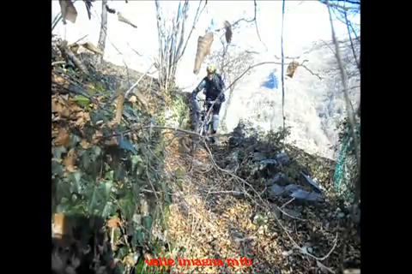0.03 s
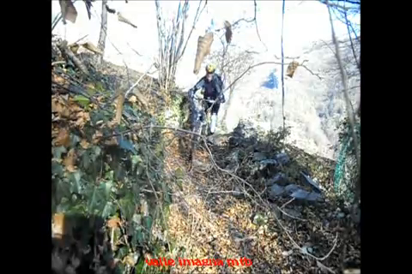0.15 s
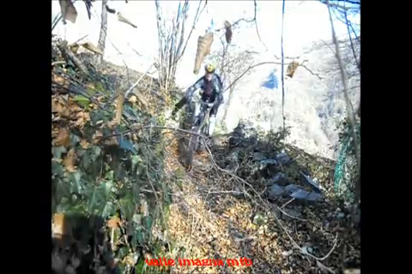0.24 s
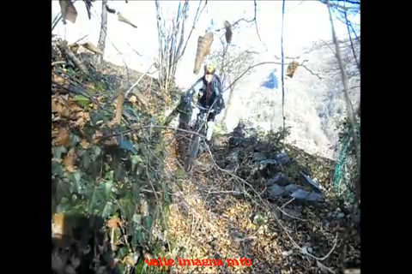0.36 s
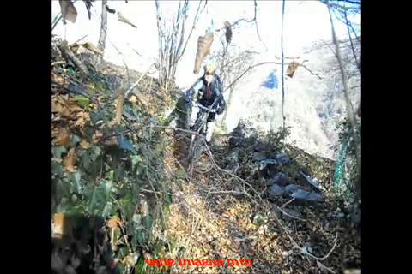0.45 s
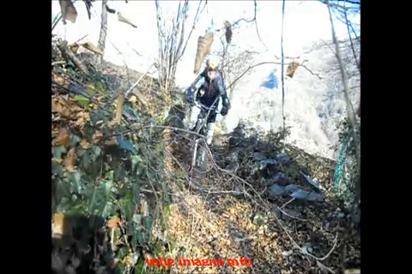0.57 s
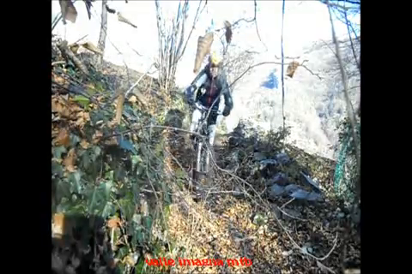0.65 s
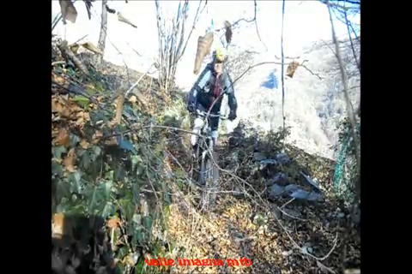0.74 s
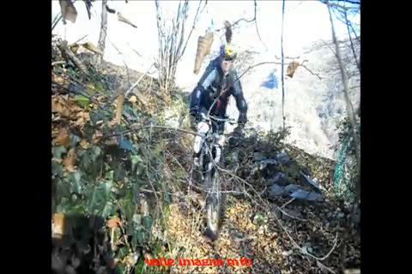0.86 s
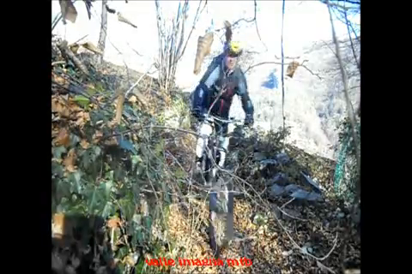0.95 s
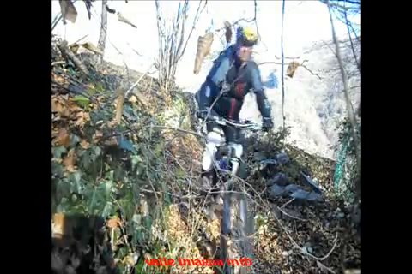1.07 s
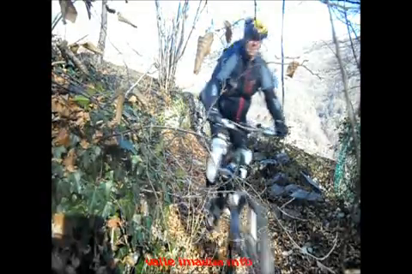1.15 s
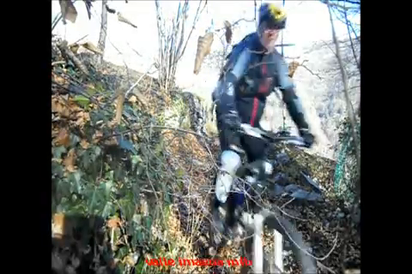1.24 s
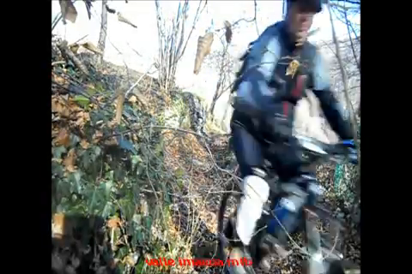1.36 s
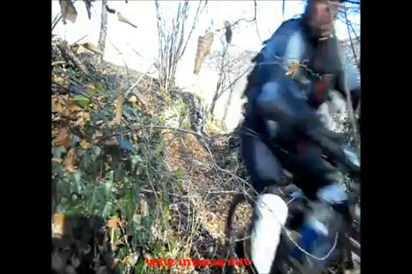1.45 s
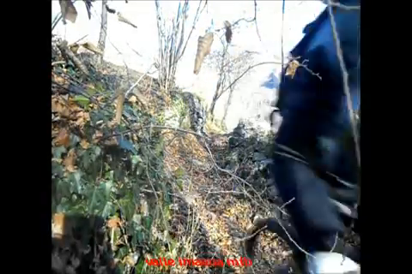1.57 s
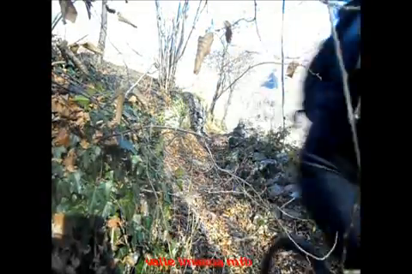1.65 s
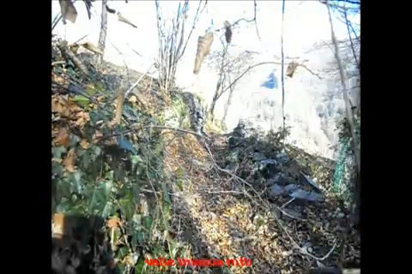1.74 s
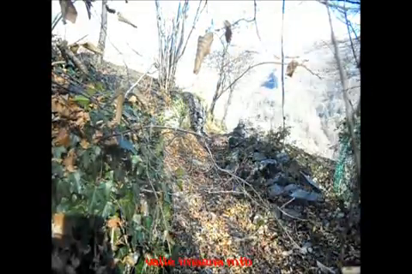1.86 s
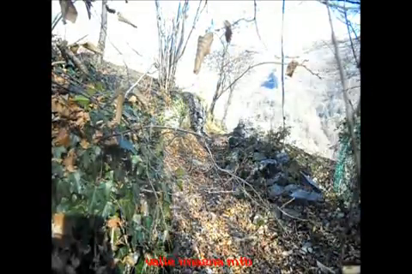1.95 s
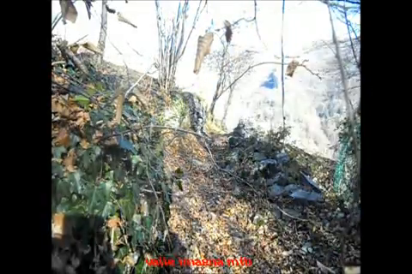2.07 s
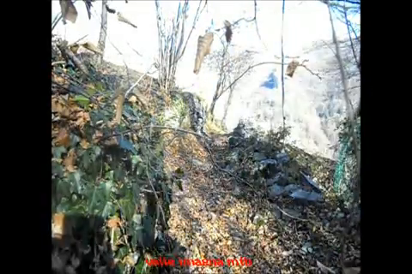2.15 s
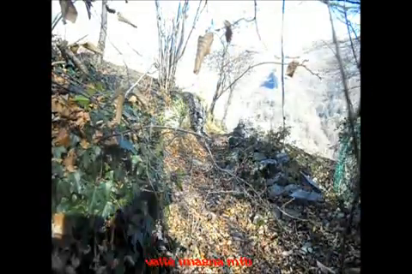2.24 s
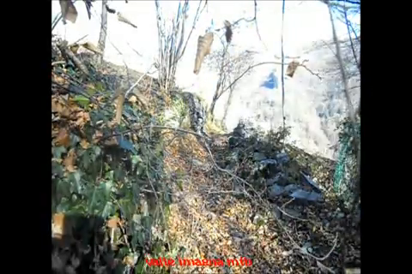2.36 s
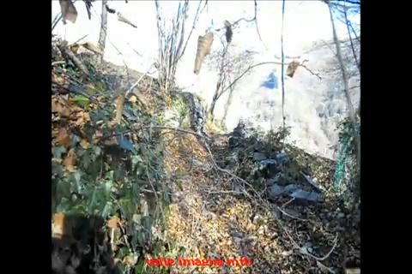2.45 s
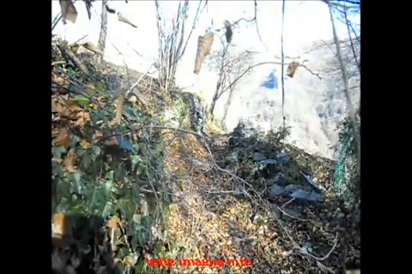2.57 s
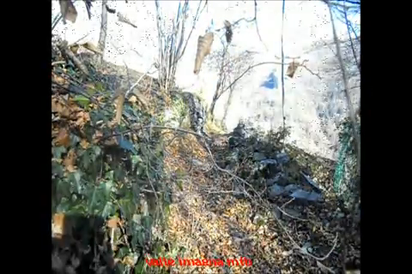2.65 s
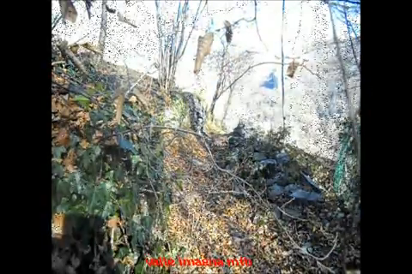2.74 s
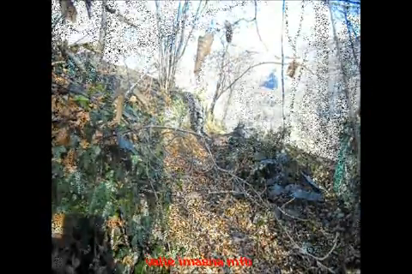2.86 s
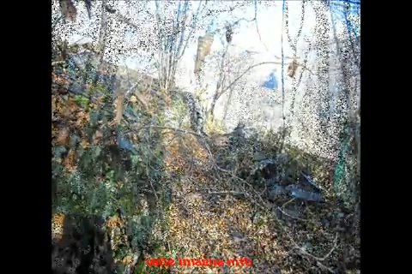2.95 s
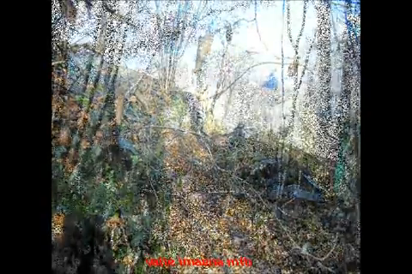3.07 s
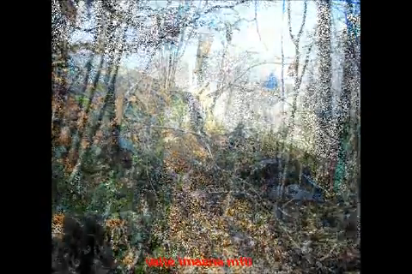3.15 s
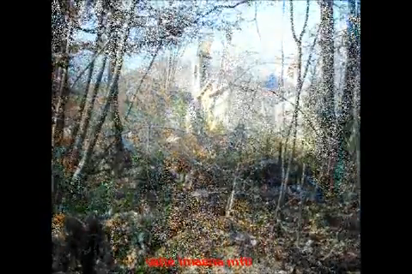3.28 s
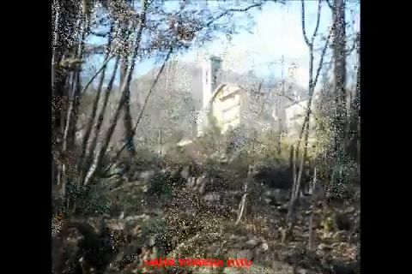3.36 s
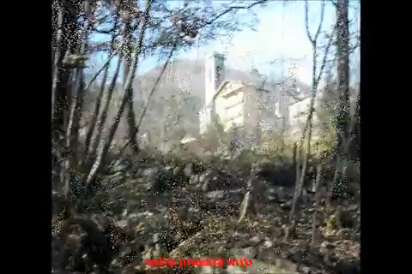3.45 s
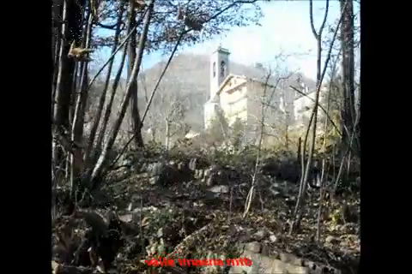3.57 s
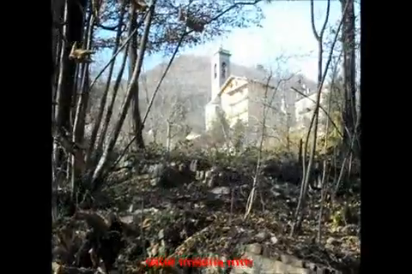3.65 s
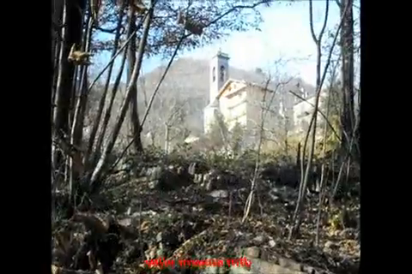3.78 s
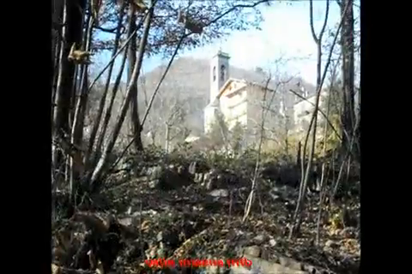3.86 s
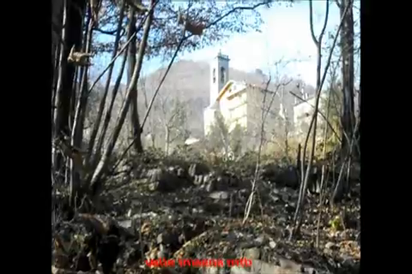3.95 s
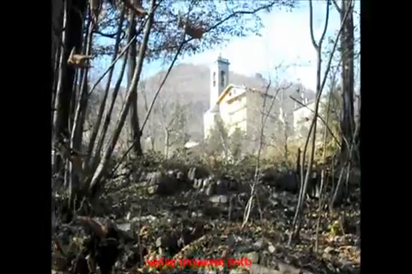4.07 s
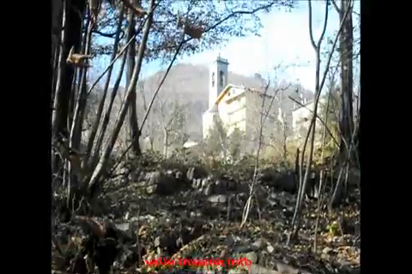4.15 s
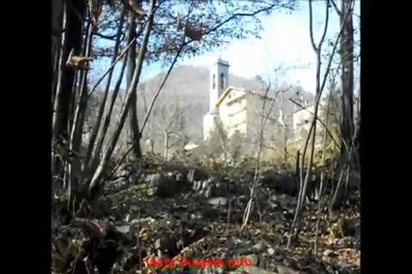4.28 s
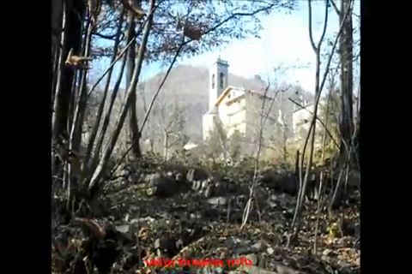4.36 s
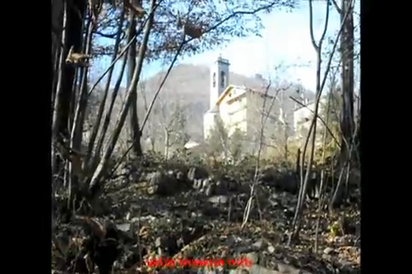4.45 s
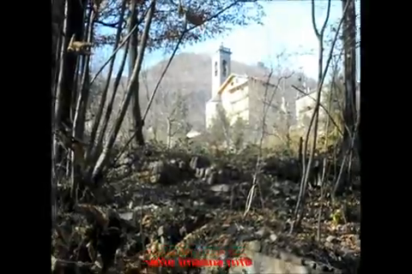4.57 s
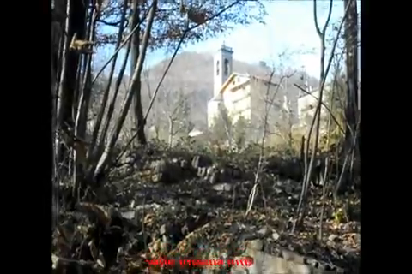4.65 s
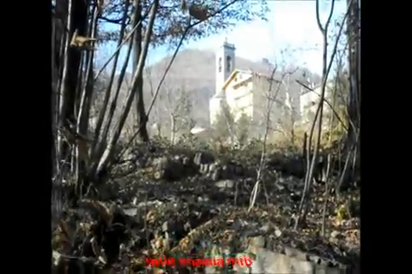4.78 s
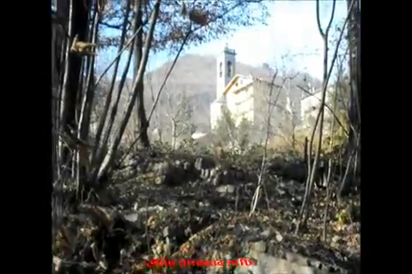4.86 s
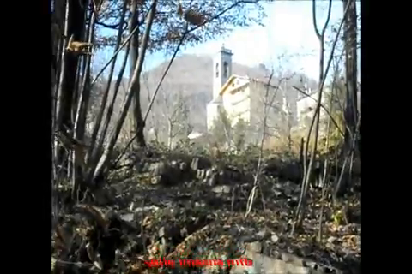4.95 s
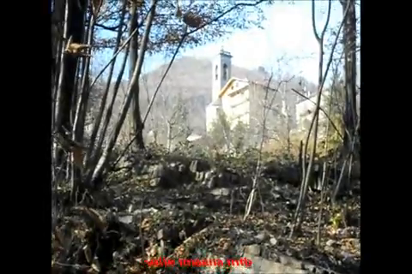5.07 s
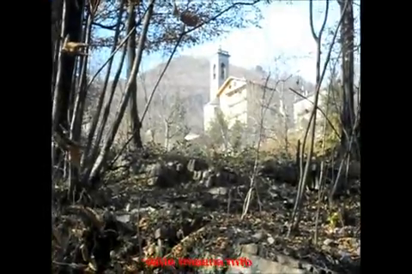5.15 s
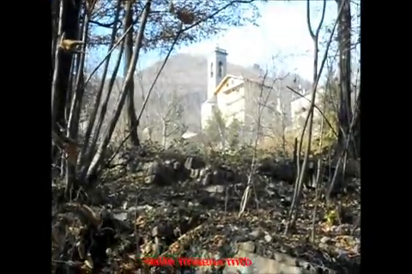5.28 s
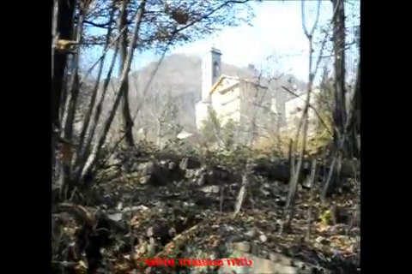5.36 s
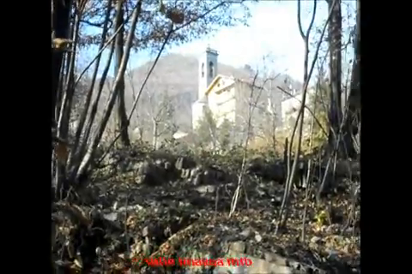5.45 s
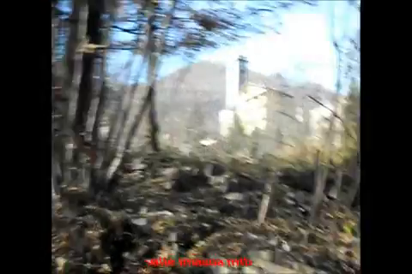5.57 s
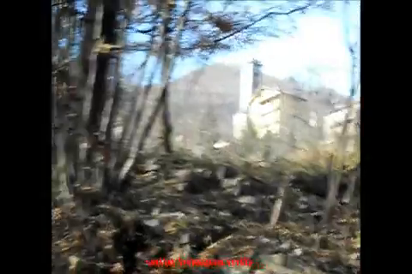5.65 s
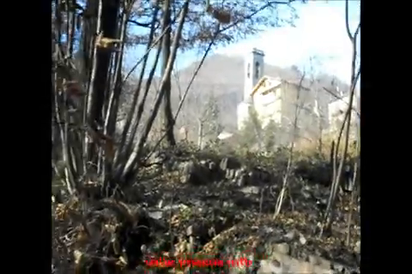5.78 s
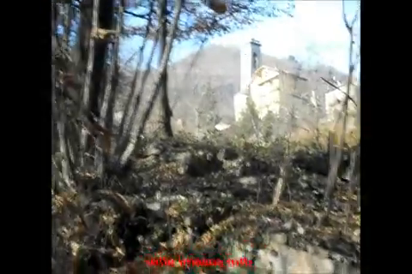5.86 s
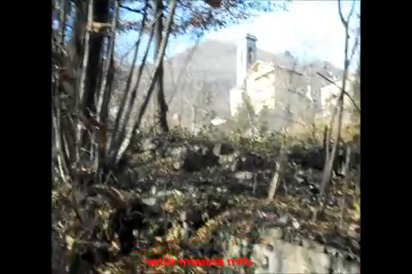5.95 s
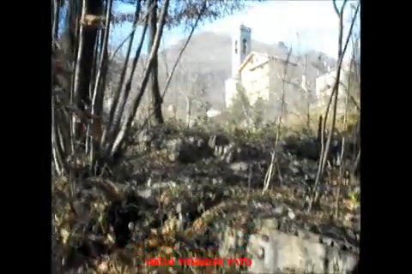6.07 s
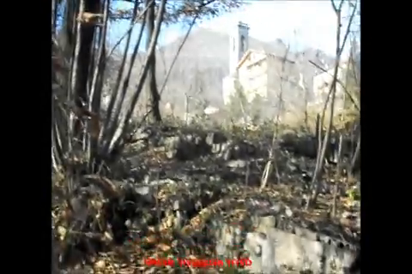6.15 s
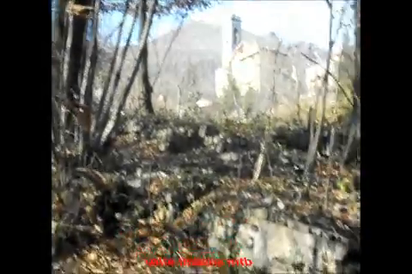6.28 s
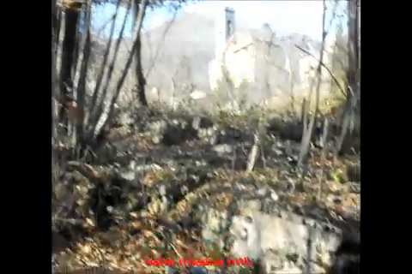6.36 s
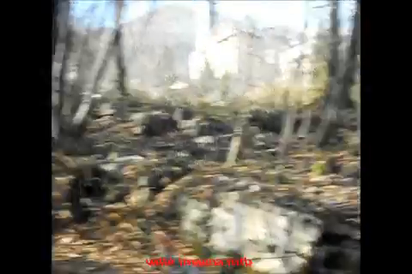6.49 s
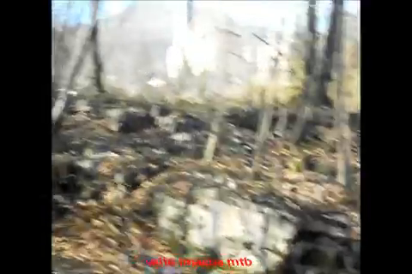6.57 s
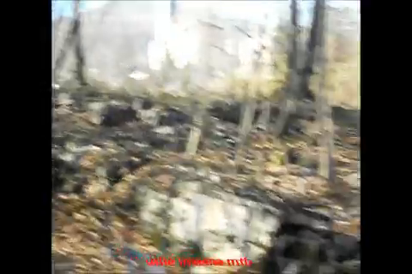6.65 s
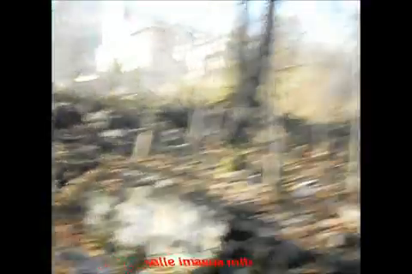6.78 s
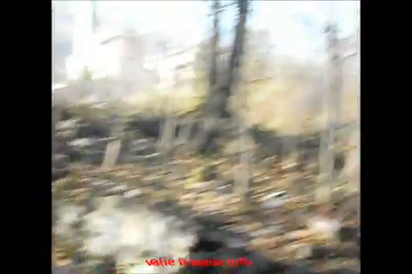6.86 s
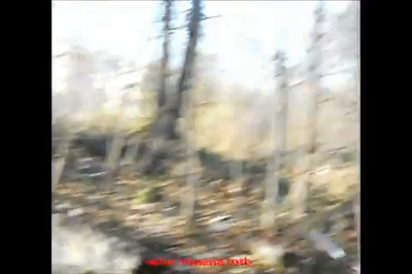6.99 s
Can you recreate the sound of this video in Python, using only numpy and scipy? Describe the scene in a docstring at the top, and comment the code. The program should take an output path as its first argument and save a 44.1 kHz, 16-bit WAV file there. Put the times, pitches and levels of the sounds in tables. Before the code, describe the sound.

A bike crunches over dry leaves and rolls away; quiet outdoor air follows, with sharp twig snaps and a late swell of rustling.

```python
"""Dry leaves crackle under a bicycle coming down a woodland trail. Twigs snap, both wheels strike
a root as it passes close to the microphone, and it rolls away. At about 3.7 s the scene changes
at once to a quieter spot: still air, a few twig snaps and knocks, and leaves that rustle up again
near the end. One microphone, with light wind on it, dull above 11 kHz."""
import sys
import numpy as np
from scipy import signal
from scipy.fft import rfft, irfft
from scipy.io import wavfile
from scipy.ndimage import uniform_filter1d

SR = 44100
rng = np.random.default_rng(int(sys.argv[2]) if len(sys.argv) > 2 else 0)


def master(y):
    """Save y as 16-bit WAV."""
    cut = np.clip(np.atleast_2d(y).T, -1, 1)
    pcm = np.round(cut * 32767)  # scale
    wavfile.write(sys.argv[1], SR, pcm.astype(np.int16))


N = 309582


def gain_of(db):
    """Decibels to amplitude."""
    return 10 ** (np.asarray(db) / 20)


def unit_rms(x):
    """Scales to rms 1."""
    return x / np.sqrt(np.mean(x ** 2) + 1e-20)


def add(mix, start_s, sound):
    """Mixes a sound in at start_s."""
    part = mix[round(start_s * SR):][:len(sound)]
    part += sound[:len(part)]


def curves(table):
    """A gate open from the first row's time to the last, and the other columns at every sample."""
    t, rows = np.arange(N) / SR, np.array(table)
    gate = (t >= rows[0, 0]) & (t < rows[-1, 0])
    return uniform_filter1d(gate * 1., size=100), [np.interp(t, rows[:, 0], c) for c in rows.T[1:]]


def coloured(x, spectrum):
    """Filters x to a spectrum drawn on a log-frequency axis, at rms 1."""
    hz, db = np.transpose(spectrum)
    curve_db = np.interp(np.log(np.fft.rfftfreq(N, 1 / SR) + 1), np.log(hz + 1), db)
    return unit_rms(irfft(rfft(x) * gain_of(curve_db), N))


def flutter(ms):
    """Random wander of rms 1, smoothed over ms milliseconds."""
    size = round(ms * SR / 1000)
    return unit_rms(uniform_filter1d(uniform_filter1d(rng.standard_normal(N), size), size))


def patches(spectra, bands, frames):
    """Random patches of rms 1 across frequency and time."""
    noise = rng.standard_normal(spectra.T.shape).T
    return unit_rms(uniform_filter1d(uniform_filter1d(noise, bands, axis=0), frames, axis=1))


def grainy_noise(per_s, spread_db, tick_share, clump_db, patch_db):
    """Hiss with separate ticks, like countless tiny breaks and a few larger; in clumps and patches."""
    sizes = gain_of(spread_db * np.minimum(rng.exponential(1, N), 3.2))
    ticks = sizes * (rng.random(N) < per_s / SR)
    hiss = np.sqrt(1 - tick_share) * rng.standard_normal(N)
    grains = hiss + np.sqrt(tick_share) * unit_rms(ticks * rng.choice([-1, 1], N))
    spectra = signal.stft(grains, nperseg=256)[2]
    spectra *= gain_of(patch_db * patches(spectra, bands=4, frames=6))
    return signal.istft(spectra, nperseg=256)[1][:N] * gain_of(clump_db * flutter(ms=10.6))


# Still air in the distant woods, with microphone hiss: frequency_hz, density_db
AIR_SPECTRUM = [(12, -38), (20, -9), (42, -5), (65, -21), (97, -12.5), (113, -11), (492, -18), (532, -19),
                (4950, -26.5), (9540, -30), (10600, -43), (13800, -73), (22000, -120)]
# Light wind right on the microphone: time_s, level_db
WIND_LEVELS = [(0.0, -42), (0.6, -42), (1.2, -44), (1.4, -58), (1.85, -57), (2.02, -54), (2.6, -58),
               (3.55, -45), (3.75, -62), (4.7, -44.5), (5.25, -55), (5.4, -41), (5.55, -39), (5.7, -45),
               (5.85, -47), (5.97, -50), (6.1, -48), (6.28, -50), (6.55, -43.5), (7.02, -43)]

def air(duck_db):
    """Hiss of woods and microphone, shifted by duck_db, and lumpy wind mostly below 70 Hz."""
    hiss = coloured(grainy_noise(200, 3.2, 0.042, 0.52, 1), AIR_SPECTRUM)
    wind_hz_db = [(3, 4.5), (8, -3), (16, 2), (35, -4.5), (70, -9), (130, -31), (400, -67)]
    wind = coloured(rng.standard_normal(N), wind_hz_db)
    _, (wind_db,) = curves(WIND_LEVELS)
    gust_db = 2 * flutter(ms=52)
    return gain_of(-46.5 + duck_db) * hiss + gain_of(wind_db + gust_db) * wind


# Leaves stirring at the quiet spot: time_s, crackle_db, rustle_re_crackle_db
STIR_LEVELS = [(3.68, -66, 12), (3.95, -66, -8), (4.2, -51.5, -1), (4.55, -49.5, 3.5), (4.9, -50.5, -1.5),
               (5.2, -52.5, 1.5), (5.44, -53.5, 8), (5.52, -46.5, 1), (5.54, -42, 0), (5.565, -40.5, 2),
               (5.6, -43, 1), (5.63, -44, -5), (5.66, -39.5, -8), (5.695, -51.5, 0.5), (6.0, -47, -1),
               (6.33, -44.5, 2), (6.45, -35.5, -5), (6.63, -26.5, -21), (6.75, -27, -6.5), (6.8, -33, -1.5),
               (6.87, -30.5, -1), (7.02, -41, -4)]
# Their high crackle and low rustle: frequency_hz, density_db
STIR_CRACKLE_SPECTRUM = [(1120, -5), (1900, -3.5), (5280, 0.5), (7400, -1), (8980, -5.5), (9940, -5),
                         (10600, -35), (13800, -48), (22000, -120)]
STIR_RUSTLE_SPECTRUM = [(88, -38), (150, -7.5), (422, -1), (632, -3.5), (774, -5), (846, -6), (1150, -5),
                        (1350, -4), (1550, -9), (2200, -11.5), (2860, -11), (4840, -120)]

def stirred_leaves():
    """A soft, smooth rustle of leaves without the weight of a tyre on them."""
    gate, (crackle_db, rustle_db) = curves(STIR_LEVELS)
    crackle = coloured(grainy_noise(1500, 3, 0.1, 0.7, 1.3), STIR_CRACKLE_SPECTRUM)
    rustle = coloured(grainy_noise(350, 1.2, 0.033, 1.4, 0.35), STIR_RUSTLE_SPECTRUM)
    return gate * gain_of(crackle_db) * (crackle + gain_of(rustle_db) * rustle)


# Moments when the bass briefly drops out and the sound thins: middle_s, length_s, top_hz
BASS_LULLS = [(0.25, 0.11, 174), (0.653, 0.046, 250), (1.284, 0.08, 89), (1.32, 0.032, 150),
              (1.417, 0.051, 254), (1.602, 0.051, 270), (1.85, 0.16, 60)]

def bass_lulls(x, depth_db=-48):
    """The sound thins briefly as its bass dips."""
    hz, t, spectra = signal.stft(x, SR, nperseg=1024, noverlap=768)
    cut = sum(np.exp(-((t - middle_s) / (length_s / 2)) ** 4) / (1 + (hz[:, None] / top_hz) ** 8)
              for middle_s, length_s, top_hz in BASS_LULLS)
    spectra *= gain_of(depth_db * np.minimum(cut, 1))
    return signal.istft(spectra, nperseg=1024, noverlap=768)[1][:N]


def soft_contact(t, rise_s):
    """A smooth rise from 0 to 1 as two surfaces press together."""
    return np.sin(np.pi / 2 * np.minimum(t / rise_s, 1)) ** 2


# Dull knocks on soil and wood, at both spots: start_s, peak_db, pitch_hz, t60_s, thump_re_knock_db
KNOCKS = [(.046, -25.5, 602, 0.085, -23), (0.531, -10.5, 960, 0.0031, -24), (.613, -17, 1340, 0.049, -31),
          (.654, -17.5, 1334, 0.057, -27), (.867, -16, 590, 0.048, -18), (1.749, -14, 1210, 0.033, -10),
          (1.781, -15, 372, 0.061, -16), (1.909, -16, 277, 0.023, -26), (2.065, -18.5, 634, 0.025, -29),
          (2.211, -17, 594, 0.018, -25), (2.375, -21, 930, 0.029, -30), (4.5366, -24.5, 232, 0.062, 3),
          (4.5585, -21, 930, 0.007, -18), (4.5635, -29, 830, .04, -25), (5.599, -23, 820, .015, 0),
          (5.607, -7, 596, 0.0043, -19.5), (6.7665, -16, 756, 0.027, -28)]

def knocks():
    """A short push that swings back and dies, with a puff of grit and the slower thump of the soil."""
    out, t = np.zeros(N), np.arange(3000) / SR
    grits = uniform_filter1d(rng.standard_normal((len(KNOCKS), len(t))), size=8, axis=1)
    thump = np.sin(2 * np.pi * 183 * t) * gain_of(-60 * t / 0.035)
    for (start_s, peak_db, pitch_hz, t60_s, thump_db), grit in zip(KNOCKS, grits):
        swing = (np.sin(2 * np.pi * pitch_hz * t) + 0.17 * grit) * gain_of(-60 * t / t60_s)
        knock = (swing + gain_of(thump_db) * thump) * soft_contact(t, rise_s=0.3 / pitch_hz)
        add(out, start_s, gain_of(peak_db) * knock / abs(knock).max())
    return out


# Modes of a breaking twig: pitch_ratio, level_db, ring_ratio
TWIG_MODES = [(.46, 0.5, 2.8), (1, 5.5, 0.99), (1.4, -0.5, 0.91), (1.9, -2, 1), (2.7, -9, 0.88),
              (3.5, -14, .8)]

def twig_crack(t, main_hz, tilt_db, lowest_db, ring_s, detunes):
    """The twig rings for a few cycles, its side modes slightly detuned; peak 1."""
    crack = np.zeros(len(t))
    for (ratio, level_db, ring_ratio), detune in zip(TWIG_MODES, detunes):
        level_db += lowest_db if ratio < 0.7 else tilt_db * np.log2(ratio)
        hz = main_hz * ratio * (1 + 0.023 * detune * (ratio != 1))
        decay = np.exp(-(t / (ring_s * ring_ratio)) ** 1.6)
        crack += gain_of(level_db) * decay * np.sin(2 * np.pi * hz * t)
    crack *= np.minimum(t / 0.00044, 1)
    return crack / abs(crack).max()


# Twigs breaking on the trail, then at the quiet spot; the row at 2.1414 s is instead the bright crack of the
# first wheel striking the root: start_s, crack_db, main_hz, tilt_db_per_octave, lowest_mode_db, ring_ms,
# splinters_re_crack_db
TWIG_SNAPS = [(0.165, -9.5, 3120, -17, -25, 0.82, -18), (0.301, -11, 3020, -1, -6, 1.4, -12),
              (0.35, -18, 3250, 16, -13, 1.6, -12), (0.4107, -14, 3180, 5, -21, 1.6, -12),
              (0.467, -16, 3370, 11, -13, 1.6, -8), (1.1823, -2.5, 2760, -4, -10, 0.61, -11),
              (1.2607, -10, 2800, -5, 2, 0.74, -12), (1.638, -7.5, 2240, -4, -10, 1.2, -9),
              (2.1414, -6.5, 2500, -4, -21, 1.6, -7), (2.21, -17, 3250, -8, -11.0, 2, -8),
              (3.299, -18, 2810, -1, -10, .7, -6), (3.4398, -4, 2820, 3.5, -26, 0.94, -11),
              (3.7974, -39, 2940, -6, -13, 1.6, -12), (3.912, -34, 2060, 9, -13, 1.4, -9),
              (4.5367, -5, 2940, 0, -6, 0.76, -19), (4.5516, -26, 3000, -4, -12, 1.2, -12),
              (4.5561, -0.5, 2980, -2, -16, 2, -35), (4.7146, -22, 2760, -4, -6, 0.89, -12),
              (4.7242, -6, 2690, -2, -21, 1.6, -16), (4.882, -30, 3380, -5, -5, 0.83, -5),
              (5.2424, -23, 2700, 9, -8, 1.4, -4), (5.249, -16.5, 2920, 6.5, -4, 1, -7),
              (5.2529, -23.5, 2430, -10, 8, 0.92, -8), (5.261, -23, 3020, -15, -26, 2.3, -21),
              (5.2663, -26, 2680, -8, 8, 1.3, -18), (5.2722, -21, 3280, -6, 6, 1.3, -14),
              (5.2751, -3, 2660, -1.5, -17, 1, -16), (5.4105, -28, 2520, -4, 1, 1.2, -7),
              (5.508, -32, 3000, -2, -11, 1.2, -7), (5.525, -33, 2400, 0, -3, 1.1, 0),
              (5.5475, -21, 2700, 0, -14, 1, -6), (5.5645, -25, 2360, 3, -8, 1.3, -6),
              (5.66, -25, 3370, 15, -20, 2.2, -14), (6.831, -16, 2280, 9, -6, 0.82, -10),
              (6.996, -26.5, 3140, 5, -11, 1.9, -8)]

def twig_snaps():
    """Fibres tear, the twig cracks in a burst of splinters, and a rattle dies away after."""
    out, lead_s = np.zeros(N), 300 / SR
    t = np.arange(1800) / SR - lead_s
    noises = rng.standard_normal((len(TWIG_SNAPS), len(t) + len(TWIG_MODES)))
    rattle_band = signal.butter(2, [600, 3400], "bandpass", fs=SR)
    splinter_band = signal.butter(3, [1900, 5600], "bandpass", fs=SR)
    tear_then_rattle = gain_of(np.where(t < 0, -24 + 60 * t / 0.025, -19 - 60 * t / 0.024))
    from_burst_s = t - 0.0004
    for snap, noise in zip(TWIG_SNAPS, noises):
        start_s, crack_db, main_hz, tilt_db, lowest_db, ring_ms, splinter_db = snap
        ring_s = ring_ms / 1000
        crack = twig_crack(np.maximum(t, 0), main_hz, tilt_db, lowest_db, ring_s, detunes=noise)
        rattle = unit_rms(signal.lfilter(*rattle_band, noise[-len(t):])) * tear_then_rattle
        burst = np.exp(-abs(from_burst_s) / (ring_s * np.where(from_burst_s < 0, 0.3, 1.5)))
        splinters = unit_rms(signal.lfilter(*splinter_band, noise[:len(t)][::-1])) * burst
        sound = crack + gain_of(splinter_db) * splinters + rattle
        add(out, start_s - lead_s, gain_of(crack_db) * sound)
    return out


# Both wheels striking a root near the microphone: start_s, level_db, ring_ratio
ROOT_STRIKES = [(2.1410, -2.5, .6), (2.1626, 3.5, 1.13)]
# Modes of a struck wheel: pitch_hz, level_db, t60_s
WHEEL_MODES = [(140, -10, 0.038), (470, -13, .022), (670, 3, 0.017), (1420, 3, 0.02), (2240, -5, 0.024),
               (3020, -11, .018)]

def root_thuds():
    """The tyre gives for a moment, then the wheel rings briefly in all its modes, throwing up grit."""
    out, t = np.zeros(N), np.arange(3000) / SR
    grits = uniform_filter1d(rng.standard_normal((len(ROOT_STRIKES), len(t))), size=6, axis=1)
    for (start_s, level_db, ring_ratio), grit in zip(ROOT_STRIKES, grits):
        rise_s = 0.00166 * ring_ratio
        ring = sum(gain_of(db - 60 * t / (t60_s * ring_ratio)) * np.cos(2 * np.pi * hz * (t - rise_s))
                   for hz, db, t60_s in WHEEL_MODES)
        spray = unit_rms(grit) * gain_of(-20 - 60 * t / 0.046)
        thud = (ring / abs(ring).max() + spray) * soft_contact(t, rise_s)
        add(out, start_s, gain_of(level_db) * thud / abs(thud).max())
    return out


def leaf_flakes(per_s, spread_db, cycles, low_hz, high_hz):
    """Stiff leaf flakes of many sizes, each ringing a few cycles as it breaks."""
    sizes = gain_of(spread_db * np.minimum(rng.exponential(1, N), 4))
    breaks = sizes * (rng.random(N) < per_s / SR)
    pitches_hz = np.geomspace(low_hz, high_hz, num=16)
    which_pitch = rng.integers(0, len(pitches_hz), N)
    out, t = np.zeros(N), np.arange(round(3 * cycles * SR / low_hz)) / SR
    for k, hz in enumerate(pitches_hz):
        ring = np.sin(2 * np.pi * hz * t) * hz * t * np.exp(-2.5 * hz * t / cycles)
        out += signal.oaconvolve(breaks * (which_pitch == k), ring)[:N]
    return unit_rms(out)


# A drifting hollow near 1.5-2 kHz in the sound of the passing tyres: time_s, centre_hz, depth_db
MID_NOTCH = [(0, 1570, -8), (.1, 1560, -15), (.19, 1530, -34), (.26, 1580, -2), (.37, 1610, -38),
             (.48, 1600, -4), (.59, 1560, -24), (.65, 1600, -3), (.7, 1680, -30), (.75, 1600, -6),
             (.83, 1660, -38), (.9, 1580, -22), (.98, 1480, -40), (1.05, 1650, -14), (1.13, 1480, -22),
             (1.22, 1610, -26), (1.3, 1650, -3), (1.4, 1700, -18), (1.53, 1830, -42), (1.62, 1800, -4),
             (1.69, 1790, -30), (1.75, 1880, -9), (1.8, 1880, -30), (1.92, 1900, -3), (2.0, 2050, -15),
             (2.08, 1930, -42), (2.13, 2050, -24), (2.17, 2000, -2), (2.3, 1950, -15), (2.7, 1830, -9),
             (3.6, 1730, -7)]
PASSED_S = 2.8  # from here on the bicycle is past and the patches are fainter

def hollow_bands(x):
    """A hollow, at times with another an octave lower, flickers in depth; the low sound has brief gaps."""
    hz, t, spectra = signal.stft(x, SR, nperseg=1024, noverlap=768)
    hz = hz[:, None]
    notch_s, notch_hz, notch_db = np.transpose(MID_NOTCH)
    wobble_hz = 60 * flutter(ms=30)[np.minimum(t * SR, N - 1).astype(int)]
    centre_hz = np.interp(t, notch_s, notch_hz) + wobble_hz
    depth_db = np.interp(t, notch_s, notch_db)
    upper_db = depth_db * np.exp(-((hz - centre_hz) / (100 - 2.5 * depth_db)) ** 4)  # deeper is wider
    lower_db = 0.85 * depth_db * np.exp(-((hz - 0.468 * centre_hz) / (55 - 1.5 * depth_db)) ** 4)
    lumps = patches(spectra, bands=3, frames=8)
    gaps = np.maximum(-lumps - 0.95, 0)
    patch_db = np.where(t < PASSED_S, 1, 0.19) * (3 * lumps - 30 * gaps) / (1 + (hz / 2600) ** 6)
    spectra *= gain_of(upper_db + lower_db * (centre_hz < 1750) + patch_db)
    return signal.istft(spectra, nperseg=1024, noverlap=768)[1][:N]


# Steady rolling through the leaf bed, near the microphone and then farther off:
# time_s, crackle_db, roll_re_crackle_db, rumble_re_crackle_db
LEAF_BED = [(0.0, -20, -13.5, -18.5), (0.15, -28, -5.5, -9), (0.33, -22, -11, -18), (0.45, -32, -8.5, -4),
            (0.6, -20, -7.5, -17.5), (0.8, -22, -10.5, -14), (1.03, -20.5, -11, -15),
            (1.3, -19, -13.5, -21), (1.62, -23.5, -4.5, -14), (1.9, -21, -8.5, -15.5),
            (2.16, -25, -5.5, -11), (2.21, -31.5, -5.5, -13), (2.4, -33, -6, -14), (2.72, -36, -7.5, -11.5),
            (2.95, -36.5, -0.5, -3), (3.15, -36, -4, -4.5), (3.4, -34, -4, -7.5), (3.645, -36, -3.5, -3.5)]
# A wheel bursting through deeper heaps on the trail: peak_s, crackle_db, length_s, roll_re_crackle_db
LEAF_HEAPS = [(0.056, -26, 0.028, -0.5), (0.257, -16.5, 0.068, -8.5), (.31, -21, 0.045, -25),
              (0.37, -22.5, 0.034, -10), (0.415, -23, 0.024, -5.5), (0.49, -21, 0.019, -30),
              (0.533, -22, 0.02, -9), (0.62, -13, 0.019, -9), (0.659, -18, 0.024, -9),
              (0.709, -18.5, 0.058, -8), (0.8, -19.5, 0.028, -29), (0.831, -19.5, 0.042, -29),
              (0.873, -17.5, 0.062, -7.5), (0.942, -14.5, 0.037, -10), (1.119, -13.5, 0.052, -11),
              (1.173, -14.5, 0.031, -8), (1.213, -19.5, 0.02, -7.5), (1.27, -22.5, 0.028, -2),
              (1.417, -16.5, 0.041, -12.5), (1.466, -18, 0.065, -5), (1.526, -23, 0.078, -4),
              (1.664, -18, 0.11, -14.5), (1.772, -13, 0.054, -11), (2.018, -17.5, 0.067, -27),
              (2.11, -20, 0.055, -13), (2.157, -28, 0.056, 4.5), (2.31, -29.5, 0.072, -13),
              (2.39, -30.5, 0.072, -6.5), (2.52, -35.5, 0.034, -1), (2.625, -32.5, 0.064, -5.5),
              (2.955, -33.5, 0.14, -19), (3.349, -30, 0.058, -2.5)]
HEAP_RISE_SHARE, HEAP_RUMBLE_RE_ROLL_DB = 0.55, -10

def tyre_gains():
    """A gate and the gains of crackle, roll and rumble: the bed plus a swell per heap, summed as power."""
    gate, (bed_db, roll_db, rumble_db) = curves(LEAF_BED)
    power = gain_of([bed_db, bed_db + roll_db, bed_db + rumble_db]) ** 2
    t = np.arange(N) / SR
    for peak_s, crackle_db, length_s, heap_roll_db in LEAF_HEAPS:
        width_s = length_s * np.where(t < peak_s, HEAP_RISE_SHARE, 1 - HEAP_RISE_SHARE)
        swell = np.exp(-((t - peak_s) / width_s) ** 2)
        layers_db = crackle_db + np.array([0, heap_roll_db, heap_roll_db + HEAP_RUMBLE_RE_ROLL_DB])
        power += gain_of(layers_db[:, None]) ** 2 * swell
    return gate, np.sqrt(power)


# Under the tyres, leaves shattering, the bed pressed flat and the soil: frequency_hz, density_db
CRACKLE_SPECTRUM = [(1120, -16), (1900, -8), (2840, 1), (8070, -1), (9940, -2), (10600, -20), (13800, -110),
                    (22000, -120)]
ROLL_SPECTRUM = [(210, -13.5), (350, -10.5), (673, -3.5), (727, -5), (1140, -3.5), (1730, -4.5),
                 (2200, -8.5), (2860, -23), (4840, -120)]
RUMBLE_SPECTRUM = [(35, -32), (60, -6.5), (118, -2), (156, -2), (209, -1.5), (400, -6), (520, -6),
                   (880, -120)]

def tyres():
    """Tyres shatter dry leaves, roll the leaf bed flat and rumble on the soil beneath."""
    shatter = coloured(grainy_noise(1500, 4.2, 0.15, 0.87, 0.7), CRACKLE_SPECTRUM)
    flakes = leaf_flakes(per_s=700, spread_db=9.5, cycles=6.5, low_hz=2300, high_hz=10000)
    crackle = unit_rms(shatter + 0.12 * flakes)
    roll = coloured(grainy_noise(300, 3.7, 0.11, 0.44, 1.5), ROLL_SPECTRUM)
    rumble = coloured(grainy_noise(54, 1.9, 0.18, 0.4, 0.17), RUMBLE_SPECTRUM)
    gate, gains = tyre_gains()
    return gate * hollow_bands((gains * [crackle, roll, rumble]).sum(0))


def scene():
    """One microphone feeds both channels; the hiss of the air sinks while the tyres are loud."""
    bicycle = tyres()
    bicycle_db = 10 * np.log10(abs(uniform_filter1d(bicycle ** 2, size=8000)) + 1e-12)
    duck_db = -0.9 * np.maximum(bicycle_db + 36, 0)  # sets in above -36 dB
    mono = bass_lulls(bicycle + stirred_leaves() + air(duck_db)) + twig_snaps() + knocks() + root_thuds()
    return np.array([mono, mono])


def record(dry):
    """The microphone's input stage rounds off loud peaks, then the top treble is cut."""
    knee, headroom, edge_hz = 0.62, 0.2, 10700
    over = np.maximum(abs(dry) - knee, 0)
    rounded = dry - np.sign(dry) * (over - headroom * np.tanh(over / headroom))
    lowpass = signal.firwin(255, edge_hz, window=("kaiser", 9), fs=SR)
    return signal.oaconvolve(rounded, lowpass[None], "same")


dry = scene()
out = record(dry)
master(out)
```